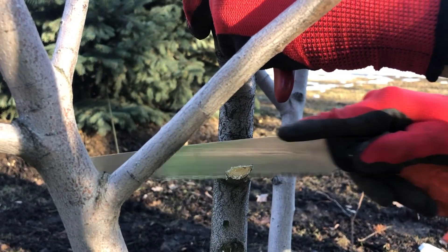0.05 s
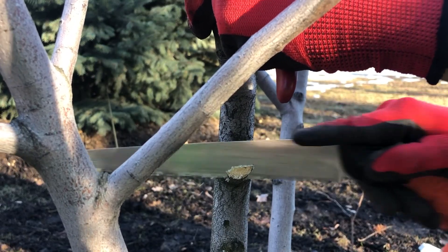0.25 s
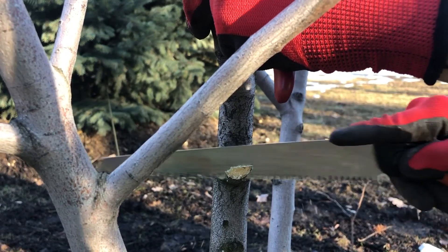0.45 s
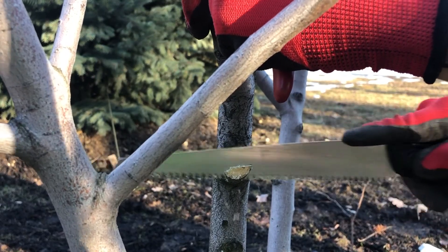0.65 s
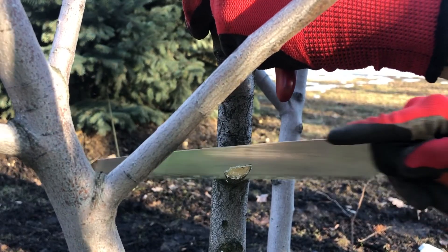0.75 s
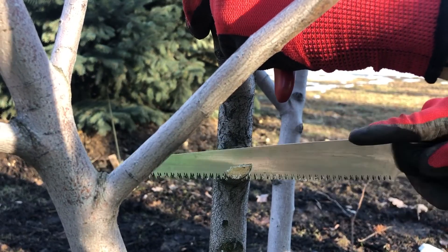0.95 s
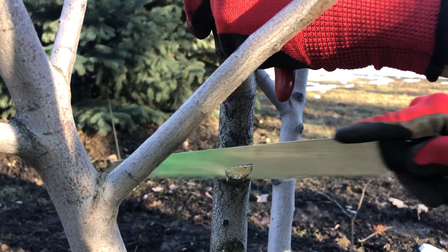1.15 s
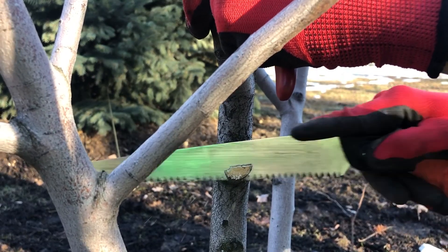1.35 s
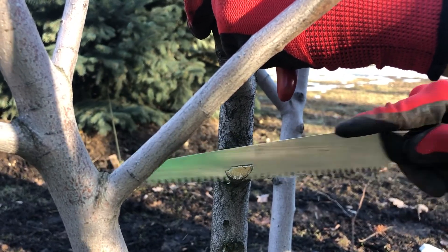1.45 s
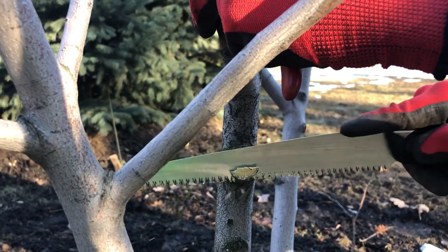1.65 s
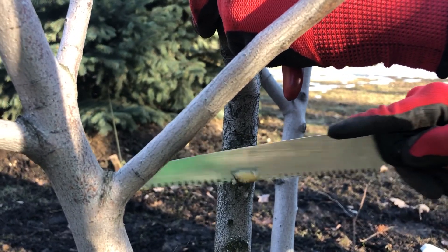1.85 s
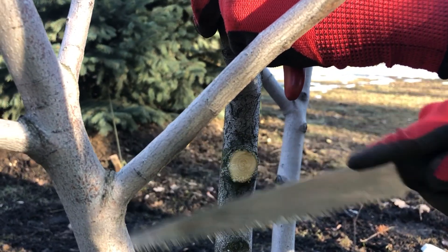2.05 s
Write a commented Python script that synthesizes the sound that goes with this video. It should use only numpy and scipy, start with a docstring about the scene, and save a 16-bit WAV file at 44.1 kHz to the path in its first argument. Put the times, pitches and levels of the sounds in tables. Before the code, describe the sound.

A hand saw rasps quickly through a small branch outdoors, over a low engine rumble.

```python
"""Outdoors, one microphone close to a pruning saw cutting a small branch until the wood parts.
At about eight strokes a second the teeth tear through fibres: pushes slide, pulls bite, the blade
judders. Now and then the steel pinches and zings, the branch rings, or fibres snap.
Well behind the saw an engine idles with a deep throb, and distant traffic slowly draws nearer."""
import sys
import numpy as np
from scipy import signal
from scipy.fft import rfft, irfft, next_fast_len
from scipy.io import wavfile
from scipy.ndimage import uniform_filter1d, map_coordinates

SR = 44100
rng = np.random.default_rng(int(sys.argv[2]) if len(sys.argv) > 2 else 0)


def master_out(mix):
    """Clip the mix to full scale and print it as 16-bit PCM to the path in sys.argv[1]."""
    frames = np.transpose(np.atleast_2d(mix))
    ceiling = np.clip(frames, -1, 1)
    pcm = np.round(ceiling * 32767).astype(np.int16)
    wavfile.write(sys.argv[1], SR, pcm)


N = 92169

# Colour of the far road's rumble and of its tyres. Each row: frequency in Hz, relative level in dB.
RUMBLE_COLOUR = [(8, -2), (16, 20.5), (45, -16.5), (75, 2), (140, -8.5), (200, -28), (300, -39.5),
                 (600, -74.5)]
TYRE_COLOUR = [(80, -19.5), (200, 3.5), (330, 0.5), (600, -2.5), (1050, -5), (1350, -13), (1550, -11.5),
               (2200, -26), (3500, -34), (8000, -35), (10000, -32), (11500, -49), (15000, -43)]
# Tones in the traffic's hum. Each row: frequency in Hz, relative level in dB.
HUM_TONES = [(304, -0.5), (335, -30.5), (362, -7.5), (445, -12.5), (1048, -10.5)]
# Tyres and hum as they reach the microphone. Each row: time in seconds, level in dB.
TYRE_LEVEL = [(0, -45), (.8, -44.5), (1.5, -43), (1.85, -42), (2.09, -41)]
HUM_LEVEL = [(0, -53.5), (1.5, -72.5), (1.8, -49.5), (2.09, -42.5)]

ENGINE_HZ, DRONE_HZ, DRONE_DB = 30.355, 49.3, -28
# The engine's throb. Each row: time in seconds, then the levels in dB of harmonics 1 to 5.
ENGINE_THROB = [(0, -26.5, -35, -36.5, -32, -39.5), (.25, -30.5, -24, -30.5, -48, -37.5),
                (.5, -25.5, -33.5, -25.5, -39.5, -38.5), (.85, -30, -23.5, -26.5, -33.5, -37.5),
                (1.1, -24, -28.5, -30.5, -40.5, -33), (1.3, -34, -29.5, -39, -35, -37.5),
                (1.55, -30.5, -31, -32, -39, -41.5), (1.8, -25.5, -30, -33.5, -44.5, -33.5),
                (2.09, -33, -25.5, -29.5, -47, -30.5)]
# Its faint upper partials. Each row: harmonic number, level in dB.
ENGINE_OVERTONES = [(6, -50), (9, -66), (10, -67.5), (12, -71.5), (15, -58.5)]

# Ringing of the branch as teeth dig in, and of the blade as it pinches.
# Each row: time of the peak in seconds, level in dB, half length in seconds, pitch in Hz.
BRANCH_RINGS = [(.135, -54, 0.014, 3800), (.323, -43.5, 0.0088, 782), (.323, -54, 0.016, 1606),
                (.407, -47, 0.0057, 3850), (.658, -48.5, 0.0083, 3560), (.835, -52.5, .012, 3600),
                (.95, -54, .02, 3540)]
BLADE_ZINGS = [(.048, -40.5, 0.0057, 8360), (0.323, -47.5, 0.03, 8300), (0.578, -40.5, 0.0076, 8000),
               (1.165, -41, 0.018, 8820), (1.213, -44, 0.013, 8500), (1.271, -48, 0.0061, 8200),
               (1.442, -31, 0.0032, 8320), (1.682, -42.5, .018, 8630), (1.935, -49, 0.018, 8500)]
# A tooth catches or fibres snap. Each row: start in seconds, level in dB, seconds to fall 60 dB.
FIBRE_SNAPS = [(.168, -34, .012), (.188, -33, .015), (.5083, -37, .022), (.692, -32, .025),
               (.701, -33, .025), (.751, -44, .016), (.7695, -38, .008), (1.686, -33, .01),
               (1.723, -39, .014), (1.9005, -33.5, .04), (1.9215, -37, .028), (1.941, -39, .025)]
# Colour of blade and branch after a snap. Each row: frequency in Hz, relative level in dB.
SNAP_COLOUR = [(300, -10), (1500, 1), (2800, 0), (3700, 2.5), (4700, 7), (6000, 4), (8500, 12), (10500, -4),
               (13500, -4), (15500, -17)]

# Strokes, push and pull in turn, each lasting until the next. Each row: start in seconds, level in dB,
# moment of top speed as a share of the stroke, judder depth (capped at MAX_JUDDER),
# breadth of the bite (1 pointed, 3 flat).
SAW_STROKES = [(-.04, -39.5, .57, 0.13, 2.5), (0.112, -37.5, 0.46, 0.37, 3.6),
               (.237, -42.5, 0.61, 0.23, 6.1), (.372, -38.5, 0.52, 0.32, 3.2), (0.499, -40, 0.7, 0.3, 2.2),
               (.625, -38.5, 0.65, 1, 3.6), (0.749, -44, 0.63, .1, 5.5), (0.871, -38.5, 0.47, .6, 3.1),
               (1.001, -43.5, .6, 0.21, 4.3), (1.122, -40, 0.56, 0.14, 3.8), (1.246, -39.5, 0.7, 0.18, 1.3),
               (1.374, -33, 0.48, 0.25, 0.61), (1.506, -44, 0.69, 0.22, 3.2), (1.622, -40.5, 0.51, .3, 2.5),
               (1.742, -46, 0.58, 0.11, 3.1), (1.857, -46, 0.34, 0.32, 5.1), (1.975, -55.5, 0.38, .1, 4.5)]
LAST_STOP_S, MAX_JUDDER = 2.09, .42
TURN_DB = -17.5  # rubbing at the turns, against top speed
# Colour of the rasp, and the added tint of a push. Each row: frequency in Hz, relative level in dB.
RASP_COLOUR = [(120, 19), (450, 5), (1000, 4), (1550, -3), (1900, -5), (2400, -1), (2950, -5), (3450, -0.5),
               (3800, -3), (4250, -1.5), (4600, -9), (5200, -2), (6600, 0.5), (7600, 3.5), (8500, 5),
               (9600, 2.5), (10700, -6.5), (12200, -11), (13200, -7.5), (15200, -22.5)]
PUSH_COLOUR = [(400, -11), (1500, 1.5), (4000, 0), (8000, -1), (14000, -0.5)]
# The thin blade's resonances. Each row: frequency in Hz, level in dB against the plain rasp.
BLADE_MODES = [(3445, -1.5), (4200, 1.5), (4776, 10), (5145, 6), (5520, -9), (6186, 2), (7697, -32),
               (8345, -1)]
BLADE_WIDTH_HZ = 25
TOOTH_HZ, TOOTH_SCATTER, BITE_S = 633.3, .25, 0.00017  # rate at top speed, unevenness, decay of a bite
JUDDER_HZ, JUDDER_SCATTER = 104.5, 0.144
PATCH_DB, DULL_DB, DULL_HZ = 3, 4.5, 10400  # colour flicker; a slow blade's loss above DULL_HZ
TOP_HZ = 15600


def amp(db):
    """Decibels to gain."""
    return 10 ** (np.asarray(db) / 20)


def unit(x):
    """Scale to rms 1."""
    return x / np.sqrt(np.mean(x ** 2) + 1e-20)


def clock():
    """The time of each sample in seconds."""
    return np.arange(N) / SR


def curves(rows):
    """One value per sample for each column after the time."""
    times, *columns = np.transpose(rows)
    return [np.interp(clock(), times, column) for column in columns]


def wobble(rate):
    """A smooth random curve, rate knots a second."""
    return map_coordinates(rng.standard_normal(4096), [clock() * rate + 2], mode="wrap")


def colour(x, points):
    """Causal filter through (Hz, dB) points; keeps the power of x."""
    size = 2 * next_fast_len(N)
    hz = np.fft.rfftfreq(size, 1 / SR)
    point_hz, point_db = np.transpose(points)
    db = np.interp(np.log(hz + 1), np.log(point_hz + 1), point_db)
    cepstrum = irfft(np.log(amp(db)), size)
    cepstrum[1:size // 2] *= 2  # folded for minimum phase
    cepstrum[size // 2 + 1:] = 0
    filtered = irfft(rfft(x, size) * np.exp(rfft(cepstrum)), size)[:N]
    return unit(filtered) * np.std(x)


def traffic():
    """Far off: deep rumble, tyre noise with a faint hiss, and a hum that swells late as it nears."""
    rumble = amp(-31.5 + wobble(7.3)) * colour(rng.standard_normal(N), RUMBLE_COLOUR)
    tyre_gain = amp(curves(TYRE_LEVEL)[0] + 0.4 * wobble(11.68))
    tyres = tyre_gain * colour(rng.standard_normal(N), TYRE_COLOUR)
    hum = sum(amp(db + 1.7 * wobble(43)) * tone(hz, drift_rad=2.14) for hz, db in HUM_TONES)
    return rumble + tyres + amp(curves(HUM_LEVEL)[0]) * hum


def tone(hz, drift_rad):
    """One partial of traffic or engine: a sine of rms 1 with a slowly wandering phase."""
    phase = 2 * np.pi * (hz * clock() + rng.random())
    return np.sqrt(2) * np.sin(phase + drift_rad * wobble(4))


def engine():
    """Well behind the saw, an idling engine: low harmonics swell on their own over a steady drone."""
    throb = sum(amp(db) * tone(k * ENGINE_HZ, drift_rad=0.45)
                for k, db in enumerate(curves(ENGINE_THROB), start=1))
    overtones = sum(amp(db) * tone(k * ENGINE_HZ, drift_rad=0.64) for k, db in ENGINE_OVERTONES)
    return throb + overtones + amp(DRONE_DB) * tone(DRONE_HZ, drift_rad=0.067)


def friction_rings(rows, width_hz):
    """At the cut, friction briefly drives one narrow resonance of the blade or the branch."""
    out, t = np.zeros(N), clock()
    for peak_s, db, half_s, hz in rows:
        phase = 2 * np.pi * hz * t
        band = wobble(2 * width_hz) * np.cos(phase) + wobble(2 * width_hz) * np.sin(phase)
        swell = np.exp(-.5 * ((t - peak_s) / half_s) ** 2)
        out += amp(db) * unit(band) * swell
    return out


def snaps():
    """Short, close cracks as teeth catch and the last fibres give way."""
    t = clock()
    force = sum((t >= start) * amp(db - 60 * np.abs(t - start) / t60) for start, db, t60 in FIBRE_SNAPS)
    return colour(force * rng.standard_normal(N), SNAP_COLOUR)


def arm():
    """The arm swings to and fro. Per sample: blade speed 0-1, loudness, judder depth, whether pulling."""
    t = clock()
    starts, db, top_share, judder, breadth = np.transpose(SAW_STROKES)
    stroke = np.searchsorted(starts, t, side="right") - 1
    lengths = np.diff(np.append(starts, LAST_STOP_S))
    progress = (t - starts[stroke]) / lengths[stroke]
    top = top_share[stroke]
    away = np.maximum(1 - progress / top, (progress - top) / (1 - top))  # 0 at top speed, 1 at a turn
    speed = np.abs(np.cos(np.pi / 2 * away))
    stroke_db = uniform_filter1d(db[stroke], SR // 100)
    loudness = amp(stroke_db + TURN_DB * away ** breadth[stroke])
    return speed, loudness, np.minimum(judder, MAX_JUDDER)[stroke], stroke % 2 == 1


def teeth(speed, spread_db, rub, grit_db, knock):
    """Each passing tooth knocks the wood and tears a tiny burst of fibres, over plain rubbing."""
    teeth_passed = np.cumsum(TOOTH_HZ * speed * np.exp(TOOTH_SCATTER * wobble(300))) / SR
    new_tooth = np.diff(np.floor(teeth_passed), prepend=0) > 0
    bites = new_tooth * amp(spread_db * rng.uniform(-1, 1, N))
    force = signal.lfilter([1], [1, -np.exp(-1 / (BITE_S * SR))], bites)
    fibres = rng.standard_normal(N) * amp(grit_db * rng.uniform(-1, 1, N))
    tearing = unit((unit(force) + rub) * fibres)
    return unit(tearing + knock * unit(bites))


def wood_grain(cut, speed):
    """The cut changes colour with the fibres it meets, and dulls as the blade slows."""
    hz, t, spectrum = signal.stft(cut, SR, nperseg=256)
    patches = uniform_filter1d(rng.standard_normal(spectrum.shape), size=3, axis=0)
    patches = unit(uniform_filter1d(patches, size=8, axis=1))
    treble = 1 / (1 + (DULL_HZ / (hz + 1)) ** 10)
    slowness = 1 - np.interp(t, clock(), speed)
    gain = amp(PATCH_DB * patches - DULL_DB * np.outer(treble, slowness))
    return signal.istft(spectrum * gain, SR, nperseg=256)[1][:N]


def saw_rasp():
    """Right at the microphone the teeth scrape louder with speed, and the blade hops and rings."""
    speed, loudness, judder, pulling = arm()
    phase = 2 * np.pi * np.cumsum(JUDDER_HZ * (1 + JUDDER_SCATTER * wobble(60.23))) / SR
    bounce = np.cos(phase) + 0.1 * np.sin(2 * phase)
    hop = np.exp(judder * np.sqrt(speed) * bounce) / np.sqrt(1 + judder ** 2)
    scrape = teeth(speed, spread_db=2.5, rub=6.6, grit_db=5.5, knock=0.11) * hop * loudness
    pushes = colour(scrape * ~pulling, PUSH_COLOUR)
    cut = colour(scrape * pulling + pushes, RASP_COLOUR)
    ring = sum(amp(db) * signal.lfilter(*signal.iirpeak(hz, hz / BLADE_WIDTH_HZ, SR), cut)
               for hz, db in BLADE_MODES)
    return wood_grain(cut + ring, speed)


def scene():
    """One channel: the saw close by, engine and traffic far behind."""
    saw = saw_rasp() + friction_rings(BLADE_ZINGS, width_hz=510)
    branch = friction_rings(BRANCH_RINGS, width_hz=350) + snaps()
    return (saw + branch + engine() + traffic())[None]


def record(dry):
    """The recorder keeps nothing above its band limit."""
    size = next_fast_len(N + SR // 2)
    in_band = np.fft.rfftfreq(size, 1 / SR) < TOP_HZ
    return irfft(rfft(dry, size) * in_band, size)[..., :N]


dry = scene()
out = record(dry)
master_out(out)
```